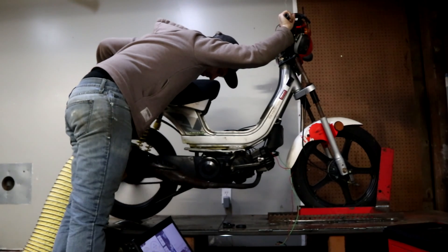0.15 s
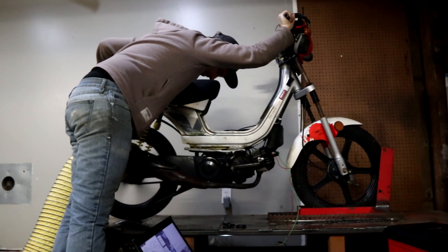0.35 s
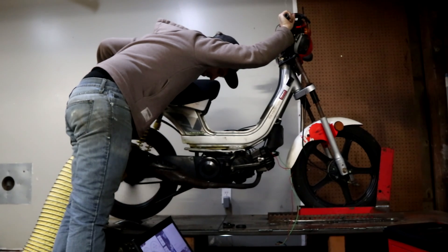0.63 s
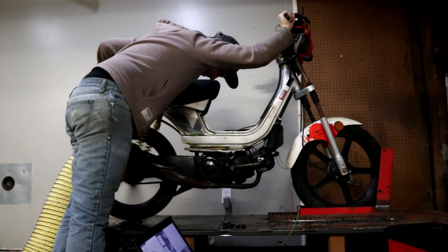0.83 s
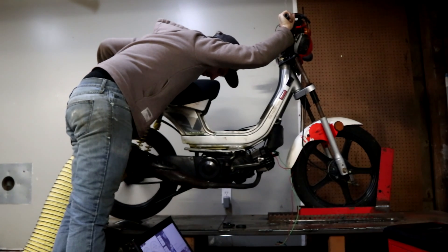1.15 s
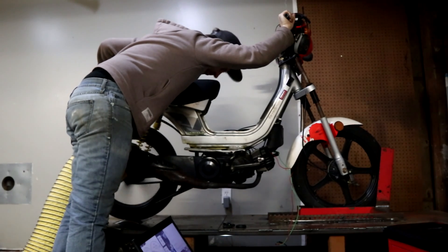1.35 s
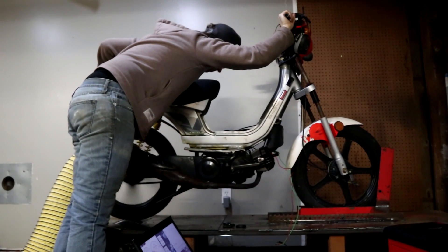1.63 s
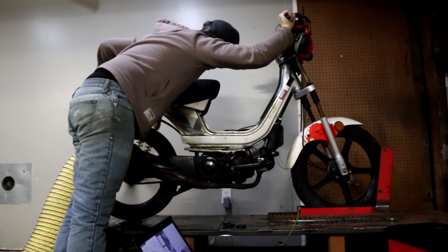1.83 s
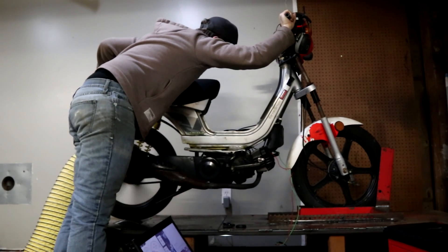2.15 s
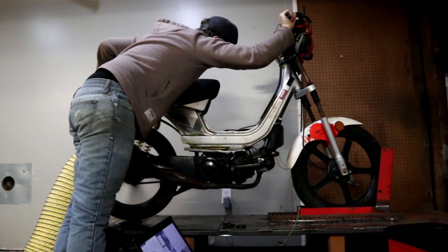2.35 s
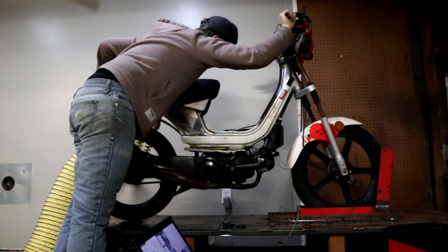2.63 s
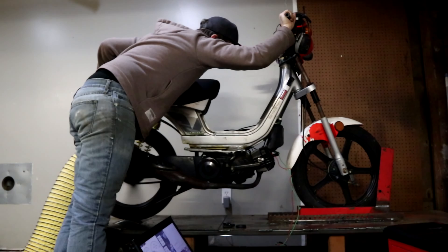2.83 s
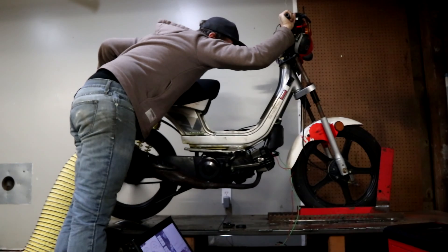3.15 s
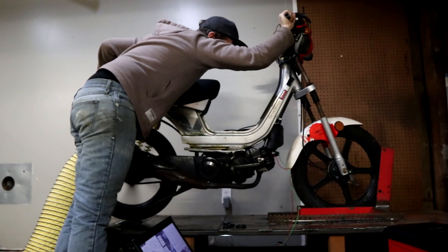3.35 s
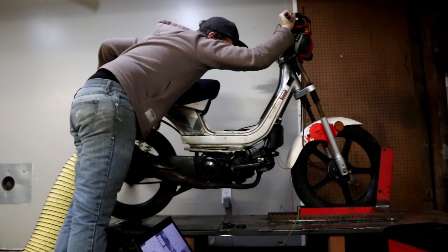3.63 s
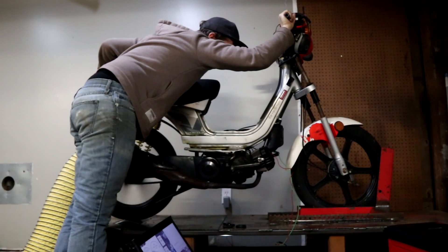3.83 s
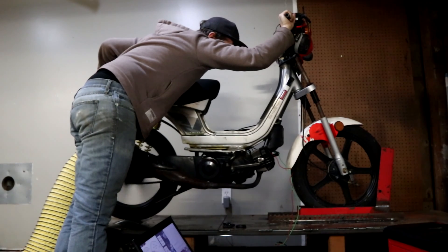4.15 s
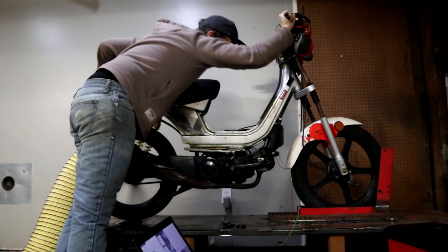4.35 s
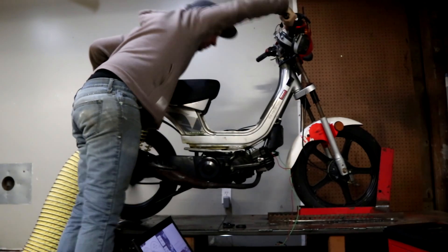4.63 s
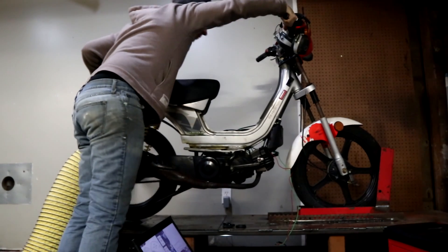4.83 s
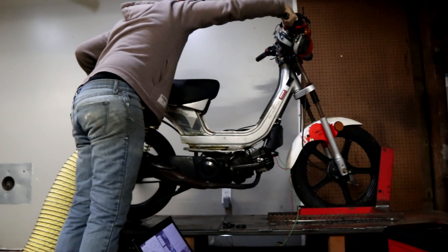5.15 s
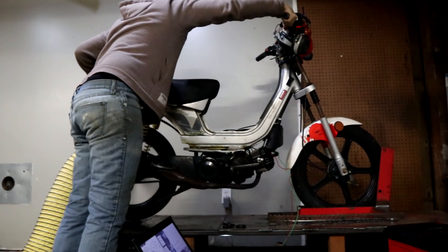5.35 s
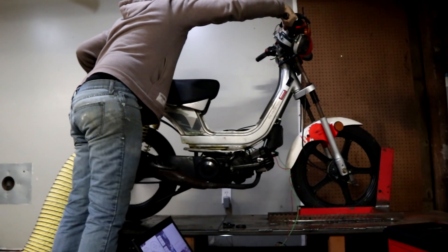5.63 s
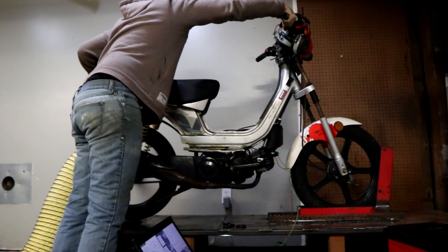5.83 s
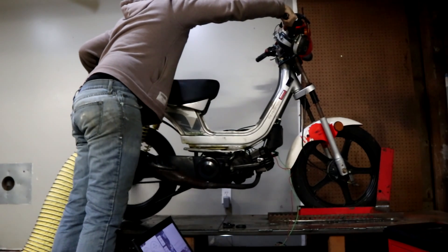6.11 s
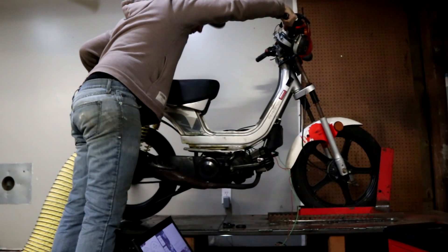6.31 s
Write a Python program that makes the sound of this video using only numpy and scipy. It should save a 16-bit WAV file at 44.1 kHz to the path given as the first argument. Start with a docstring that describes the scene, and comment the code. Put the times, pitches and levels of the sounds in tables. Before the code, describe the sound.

A small two-stroke moped engine drones at full throttle on a workshop roller, then cuts back and coasts down with uneven pops.

```python
"""A small two-stroke single pulls at full throttle on a roller bench in a hard-walled workshop.
It creeps up in speed: one blast a turn makes a buzz, one harmonic of which keeps catching a sharp pipe
resonance, over gear whine and the turbulent roar of pipe, tyre and roller.
At about 4.7 s the throttle snaps shut and the engine coasts down on the roller's momentum.
From then on it fires only now and then, in lone pops that ring the pipe and echo off the walls."""
import sys
import numpy as np
from scipy import signal
from scipy.io import wavfile
from scipy.ndimage import uniform_filter1d, map_coordinates

SR = 44100
rng = np.random.default_rng(int(sys.argv[2]) if len(sys.argv) > 2 else 0)


def bounce(signal):
    """Save signal as a 16-bit WAV file at the path given by the first command-line argument."""
    frames = np.transpose(np.atleast_2d(signal))
    limited = np.clip(frames, -1, 1)
    pcm = np.round(limited * 32767).astype(np.int16)
    wavfile.write(sys.argv[1], SR, pcm)


N = 285768
T = np.arange(0, N + 32, 32) / SR  # control times in s, one every 32 samples
SHUT_S, SHUT_TIME_S = 4.675, 0.018  # when and how fast the throttle closes

# lone firings while coasting: t/s, relative level/dB, lean toward the upper pipe mode/dB
LONE_FIRINGS = [(4.7975, -15, 2.5), (4.9232, -13, -2.5), (5.0305, -11, 0), (5.1452, -11, 1.5),
                (5.257, -10, -1.5), (5.3034, -15, -1.5), (5.3767, -10, 1.5), (5.4919, -10, 1.5),
                (5.5962, -10, .5), (5.7019, -10, .5), (5.7543, -16, -3.5), (5.8032, -12, 0),
                (5.8494, -16, -1.5), (5.9135, -12, 0), (5.9534, -15, -2.5), (6.0162, -11, 3.5),
                (6.1225, -11, 2.5), (6.2183, -12, -2.5), (6.332, -11, 1.5), (6.4308, -10, 2.5)]


def firing(hz, turns, spread_turns=0.4, treble_db=-45.0, slope_db=-0.1239, throb_db=7.0, ring_order=14):
    """The engine's buzz: harmonics of the crank speed at scattered phases, wavering in level."""
    # crank harmonics, first upward: base level/dB early in the pull, late in the pull, coasting
    harmonics = [(-33.5, -34.5, -38.5), (-41.5, -42, -38), (-40, -44, -42.5), (-30, -29.5, -38),
                 (-36.5, -39, -41.5), (-40.5, -44, -37), (-36.5, -34.5, -41.5), (-38.5, -36, -36),
                 (-34, -42.5, -34), (-54, -31, -39), (-45, -35, -39), (-34, -35, -43), (-48, -36, -39.5),
                 (-23, -24, -59), (-26, -31, -50), (-28, -28, -44), (-29.5, -39, -42), (-29, -44.5, -48),
                 (-26.5, -27.5, -48), (-28.5, -34.5, -47), (-34.5, -37.5, -48), (-38, -36, -38),
                 (-38, -34.5, -50), (-36.5, -34, -45), (-55.5, -39, -56), (-41.5, -44, -40)]
    # standing waves of pipe and shop under load: f/Hz, half width/Hz, gain/dB
    waves_loaded = [(263.5, 3.5, -12), (384.5, 2.5, 6), (395, 1.5, -6), (528, 7, -13), (648, 5, -12),
                    (660, 4, -8), (769, 5, 6), (790, 2.5, 8), (929, 8, 8), (1053, 6, 4), (1064, 3, -8),
                    (1188, 6, 6), (1536, 5, 5), (1556, 4, -8), (1586, 6, 6), (1940, 6, -4), (2005, 10, -5),
                    (2046, 5, -6), (2087, 5, 6), (2107, 10, 6), (2175, 10, 8), (2236, 4, -5), (2430, 8, -9),
                    (2512, 11, -8), (2607, 8, -5), (2686, 8, -6), (2713, 8, 7), (3025, 18, -11),
                    (3110, 6, -9), (3170, 15, -7), (3370, 15, 8), (3690, 20, 8), (3870, 10, 6),
                    (3970, 20, 8), (4225, 15, 7), (4275, 15, 8), (4352, 20, 9), (4540, 20, 7),
                    (4600, 20, 8), (4910, 45, 8), (5020, 25, 9), (5150, 15, 6)]
    # standing waves while coasting: f/Hz, half width/Hz, gain/dB
    waves_coasting = [(110, 9, -13), (240, 5, 6), (339, 5, 13), (376, 6, 7), (570, 12, 9), (692, 8, 12),
                      (715, 6, 11), (808, 7, 15)]
    coast = stages(0, 0, 0.84)
    out = np.zeros(N)
    for k in range(1, 69):
        depth = min(k / 4, 1)  # the lowest harmonics waver least
        flutter_db = wander(30) * depth * (1.3 + 2 * coast) - coast
        if k <= len(harmonics):
            db = stages(*harmonics[k - 1]) + 1.66 * depth * wander(3.86)
        else:
            db = treble_db + slope_db * (k - len(harmonics)) - 15.0 * coast + 2.0 * wander(4)
        db += (1 - coast) * standing_waves(waves_loaded, k * hz)
        db += coast * standing_waves(waves_coasting, k * hz)
        if k == ring_order:
            db = (1 - coast) * (pipe_ringing() + 0.75 * wander(7.8)) + coast * db
            flutter_db *= .5
        if k == 1:  # the fundamental lives on the lone firings
            flutter_db = throb_db * coast * (throb() - .3)
        out += tone(k * turns + spread_turns * rng.standard_normal(), db + flutter_db)
    return out


def crank():
    """Speed of the crankshaft in Hz; without steady firing it is less even."""
    # the pull and the coast-down: t/s, crank speed/Hz
    speed = [(0.0, 127.95), (0.35, 127.95), (0.7, 129.0), (1.2, 129.9), (1.45, 130.6), (1.75, 130.5),
             (2.2, 131.6), (2.3, 131.35), (2.5, 131.9), (2.7, 131.9), (2.82, 132.35), (3.15, 132.45),
             (3.55, 133.25), (3.7, 133.1), (4.45, 134.15), (4.66, 133.8), (4.8, 127.0), (4.9, 124.7),
             (5.4, 121.4), (6.0, 115.7), (6.48, 112.2)]
    uneven = stages(.0003, .0003, .003) * wander(25)
    return np.interp(T, *np.transpose(speed)) * (1 + uneven)


def pipe_ringing(rest_db=-28, edge_s=0.039):
    """Base level in dB of the loudest harmonic: a sharp pipe resonance catches, rings and lets go."""
    # spells of ringing: start/s, length/s, level/dB
    spells = [(.1, .07, -24), (.45, .47, -24.5), (.92, .31, -18.5), (1.34, .04, -22), (1.43, .22, -18),
              (1.7, .04, -19), (1.82, .33, -15.5), (2.28, .1, -14.5), (2.44, .21, -19.5),
              (2.72, .54, -17.5), (3.33, .07, -20), (3.44, .52, -19), (3.96, .5, -21), (4.5, .2, -20)]
    start, length, db = np.transpose(spells)[:, :, None]
    caught = np.clip(np.minimum(T - start, start + length - T) / edge_s + .5, 0, 1)
    return rest_db + ((db - rest_db) * caught).max(0)


def standing_waves(waves, hz):
    """Gain in dB as standing waves lift or sink a harmonic that drifts through them."""
    return sum(db * np.exp(-((hz - centre_hz) / width) ** 2) for centre_hz, width, db in waves)


def pops(gain_db=1.5, hiss_db=19.0, turn_s=.0085):
    """Each lone firing is a ragged blast into the pipe, with a weaker afterburn about a turn later."""
    # pipe modes that a pop rings: f/Hz, level/dB, t60/s, share of the lean
    modes = [(1030, -8, .03, 0), (1500, -6, .025, 0), (1800, 0, .035, -1), (2050, -1, .035, 1),
             (2700, -7, .045, 0), (3200, -9, .03, 0), (4600, -12, .02, 0)]
    t = np.arange(4000) / SR
    ragged = rng.standard_normal((len(LONE_FIRINGS), len(t)))
    detunes = 1 + .015 * rng.standard_normal((len(LONE_FIRINGS), len(modes)))  # gas heat varies by pop
    spikes = 6 * np.exp(-(t % turn_s) / .0001)
    envelope = np.exp(-t / .004) + .7 * np.exp(-abs(t - turn_s) / .003)  # burn, afterburn
    out = np.zeros(N + len(t))
    for (start_s, db, lean_db), noise, detune in zip(LONE_FIRINGS, ragged, detunes):
        blast = (.5 * noise + spikes) * envelope
        ring = sum(amp(mode_db + share * lean_db - 60 * t / t60) * np.sin(2 * np.pi * hz * shift * t)
                   for (hz, mode_db, t60, share), shift in zip(modes, detune))
        hiss = amp(hiss_db) * np.gradient(uniform_filter1d(blast, 5))
        pop = signal.fftconvolve(blast, ring)[:len(t)] + hiss
        pop = signal.lfilter(*signal.butter(2, 500, "high", fs=SR), pop)
        at = round(start_s * SR)
        out[at:at + len(t)] += amp(db + gain_db) * pop / np.linalg.norm(pop[:900]) * 10
    return out[:N]


def throb(fade_s=0.039, lead_s=0.022):
    """Pipe pressure while coasting, 0 to 1: it jumps with each lone firing and leaks away."""
    start_s, db, _ = np.transpose(LONE_FIRINGS)
    since = T - start_s[:, None] + lead_s
    kicks = amp(db - db.max())[:, None] * np.exp(-np.maximum(since, 0) / fade_s) * (since > 0)
    return uniform_filter1d(kicks.max(0), size=28)


def roar(turns, patchy_db=1.0, puff_depth=0.11, gain_db=5.5, ease_s=0.24):
    """Turbulent noise in drifting patches, puffing once a turn as the ports open, no two puffs alike."""
    # colour of the roar: f/Hz, relative level/dB under load, relative level/dB coasting
    colour = [(30, -24, -38), (63, -57, -64), (106, -15, -2.5), (208, -17.5, -7.5), (295, -11, -5.5),
              (440, -13, -5.5), (730, -3.5, 2), (1090, -2, 3.5), (1950, -2.5, -2.5), (2280, -4, -4),
              (3000, -5, -1), (3530, -8.5, -6), (4580, -8.5, -7), (8900, -18, -16.5), (9930, -24, -22),
              (13400, -27, -32.5), (15700, -34, -34)]
    # fader ride of the roar: t/s, relative level/dB
    ride = [(0.0, -25.5), (0.67, -25), (0.96, -28.5), (1.4, -26.5), (4.66, -25), (4.75, -27), (5.29, -25),
            (5.43, -25.5), (6.01, -25), (6.48, -24.5)]
    frames, hz = N // 256 + 5, np.fft.rfftfreq(1024, 1 / SR)
    real, imag, patches, flicker = rng.standard_normal((frames, 513, 4)).T
    patches = unit_rms(uniform_filter1d(uniform_filter1d(patches, 14, axis=0), 16, axis=1))
    flicker = unit_rms(uniform_filter1d(uniform_filter1d(flicker, 120, axis=0), 3, axis=1))
    colour_hz, *curves = np.transpose(colour)
    load_db, coast_db = (np.interp(np.log(hz + 1), np.log(colour_hz), db)[:, None] for db in curves)
    # the colour eases part of the way to coasting, more slowly than the throttle shuts
    blend = 0.67 * np.clip((np.arange(frames) * 256 / SR - SHUT_S) / ease_s, 0, 1)
    colour_db = load_db + (coast_db - load_db) * blend
    spectrum = (real + 1j * imag) * amp(colour_db + patchy_db * patches + 0.49 * flicker)
    noise = unit_rms(signal.istft(spectrum, nperseg=1024, noverlap=768)[1][:N])
    puffs = 1 + puff_depth * np.cos(2 * np.pi * turns)
    puff_db = np.interp(turns, np.arange(1000), rng.standard_normal(1000))
    puff_db *= per_sample(stages(0.69, 1.0, 0.5))
    lift_db = (throb() - .3) * stages(0, 0, 0.4)  # each lone firing lifts the roar
    level_db = np.interp(T, *np.transpose(ride)) + gain_db + lift_db
    return noise * puffs * amp(per_sample(level_db) + puff_db)


def drivetrain(hz):
    """Teeth and roller whine at fractional multiples of the crank; slack roughens them when coasting."""
    # gears, chain and roller: ratio to the crank early, late, coasting; level/dB under load, coasting
    whines = [(1.83, 1.83, 1.83, -50, -48), (2.33, 2.33, 2.43, -46, -43), (2.78, 2.8, 2.65, -49, -46),
              (3.8, 3.83, 3.83, -44, -55), (4.65, 4.67, 4.65, -46, -43), (5.58, 5.6, 5.3, -35, -42),
              (9.3, 9.18, 9.3, -41, -50), (14.4, 14.43, 14.53, -44, -34), (24.2, 24.28, 22.15, -39, -40),
              (25.2, 25.28, 25.6, -38, -43), (26.2, 26.28, 26.65, -38, -46)]
    out = np.zeros(N)
    for early, late, coasting, load_db, coast_db in whines:
        ratio = stages(early, late, coasting) * (1 + stages(.0007, .0007, .003) * wander(20))
        waver_db = 2.5 * wander(9) + stages(1, 1, 2.5) * wander(40)
        cycles = np.cumsum(per_sample(ratio * hz)) / SR + rng.random()
        out += tone(cycles, stages(load_db, load_db, coast_db) + waver_db)
    return out


def workshop(x, t60_s=0.19):
    """Short reverb off hard walls: sparse reflections of random sign, one in every 20 samples."""
    at = np.arange(400, SR // 2, 20)
    taps = np.zeros(SR // 2 + 20)
    decay = amp(-60 * at / SR / t60_s)
    taps[at + rng.integers(0, 20, len(at))] = rng.choice([-1., 1.], len(at)) * decay
    return signal.fftconvolve(x, taps / np.linalg.norm(taps))[:N]


def stages(early, late, coasting):
    """Slides a value through the pull, then over to its coasting value as the throttle shuts."""
    shut = np.clip((T - SHUT_S) / SHUT_TIME_S + .5, 0, 1)
    pulling = early + (late - early) * np.clip((T - .7) / 3.2, 0, 1)
    return pulling + (coasting - pulling) * shut


def wander(per_s):
    """Smooth random drift, rms near 1, that changes about per_s times a second."""
    return map_coordinates(rng.standard_normal(400), [T * per_s + 5], order=2, prefilter=False) * 1.35


def tone(cycles, db):
    """A sine whose rms level rides the control db."""
    return per_sample(np.sqrt(2) * amp(db)) * np.cos(2 * np.pi * cycles)


def per_sample(control):
    """Spreads a control from the times T over every sample."""
    return np.interp(np.arange(N) / SR, T, control)


def amp(db):
    return 10 ** (np.asarray(db) / 20)


def unit_rms(x):
    return x / np.sqrt(np.mean(x ** 2) + 1e-20)


def scene():
    """The crank drives buzz, whine and roar; only the pops feed the reverb. Mono on both channels."""
    hz = crank()
    turns = np.cumsum(per_sample(hz)) / SR
    popping = pops()
    mono = firing(hz, turns) + drivetrain(hz) + roar(turns) + popping + amp(-4.5) * workshop(popping)
    return np.array([mono, mono])


def record(dry):
    """A steep low-pass takes off the air above 15.75 kHz."""
    low_pass = signal.firwin(2047, 15750, window=("kaiser", 10), fs=SR)
    return signal.oaconvolve(dry, low_pass[None], "same")


dry = scene()
out = record(dry)
bounce(out)
```